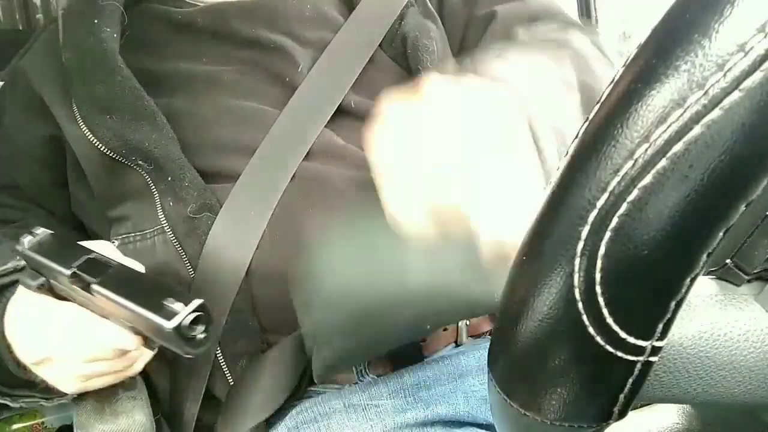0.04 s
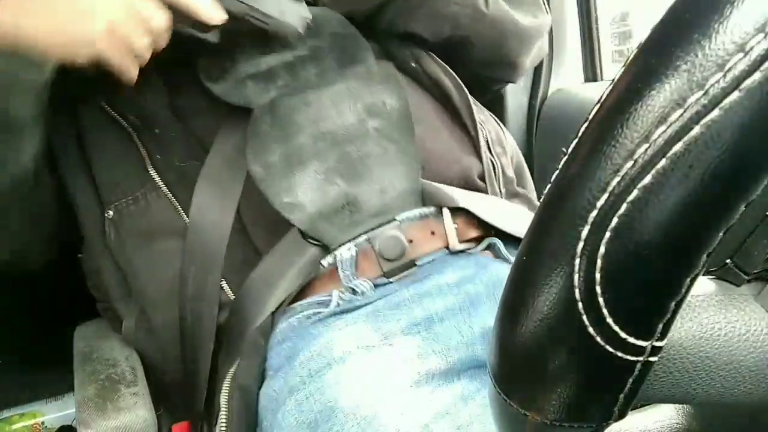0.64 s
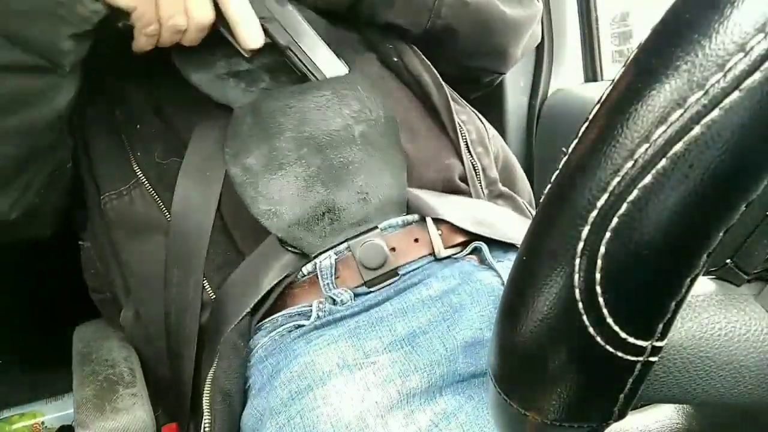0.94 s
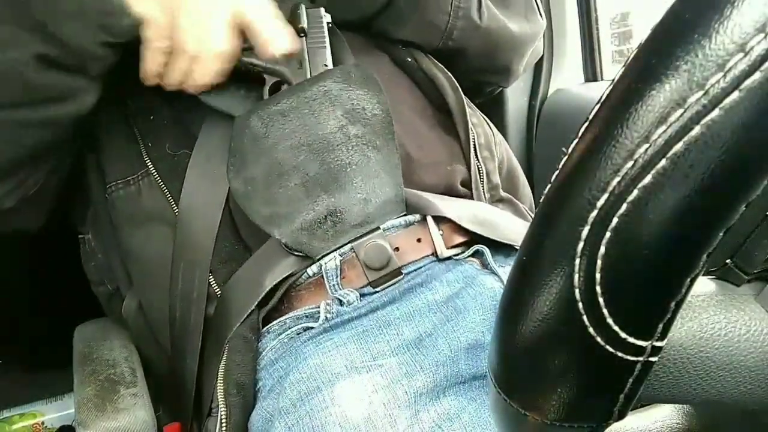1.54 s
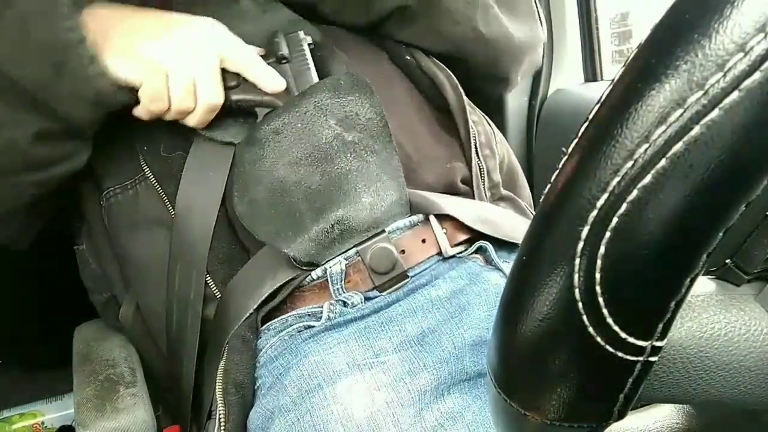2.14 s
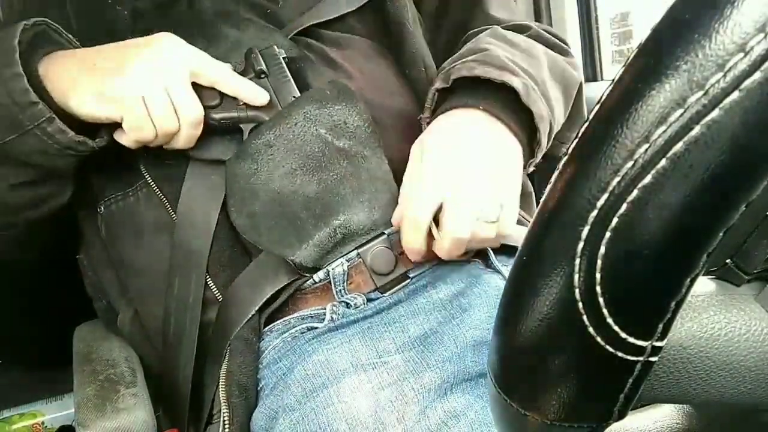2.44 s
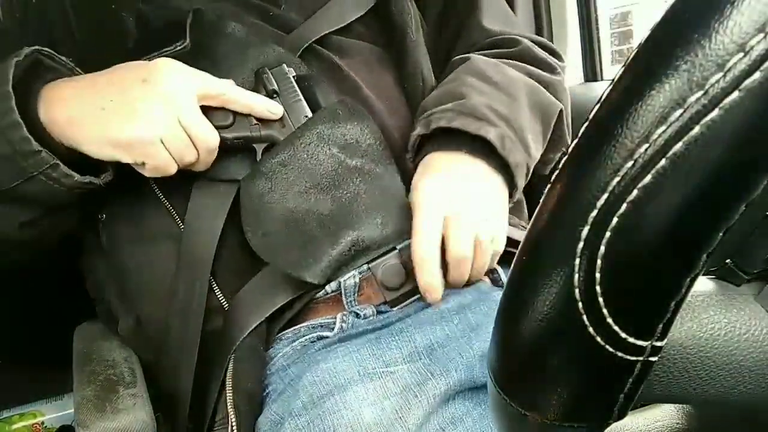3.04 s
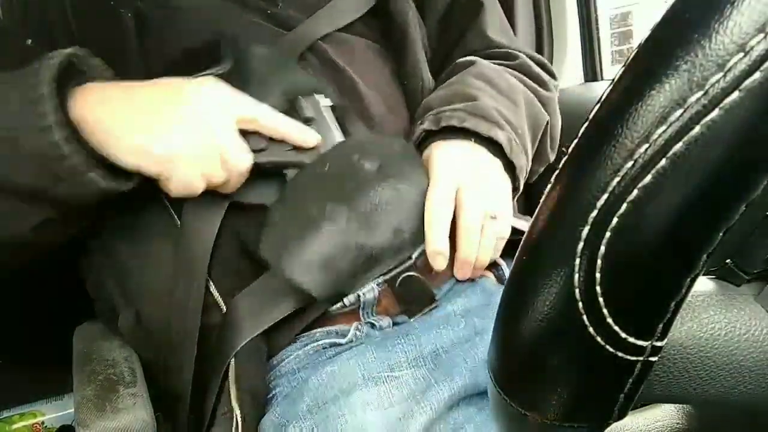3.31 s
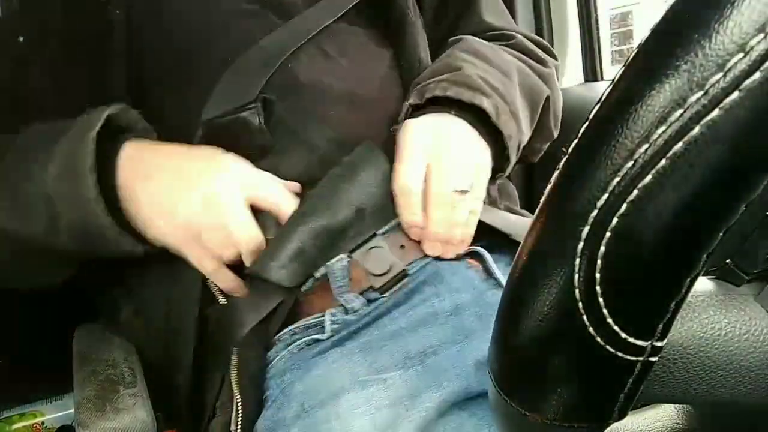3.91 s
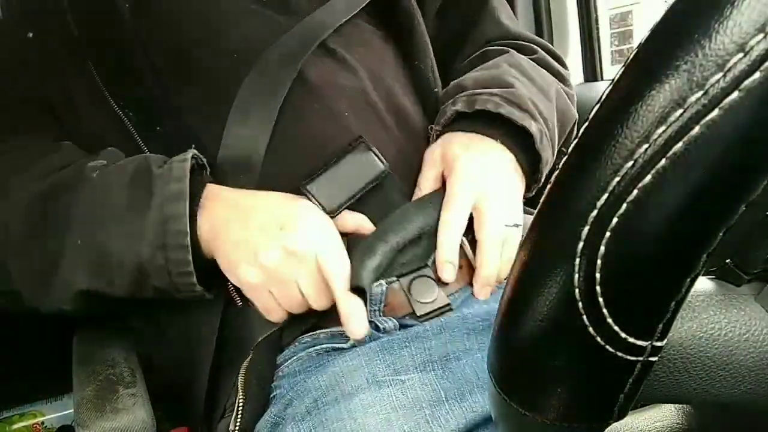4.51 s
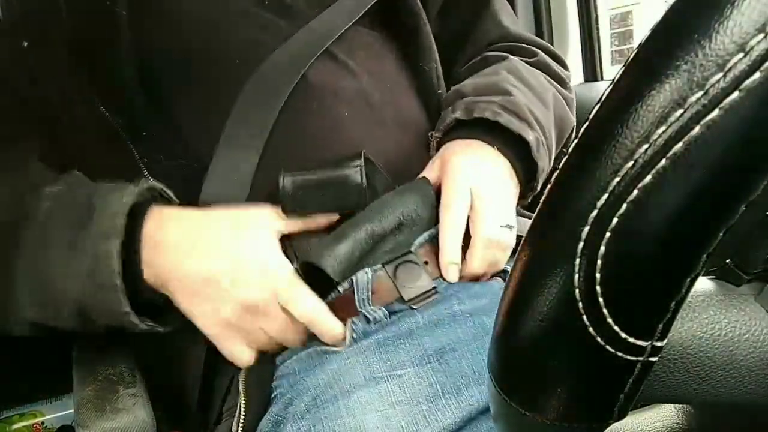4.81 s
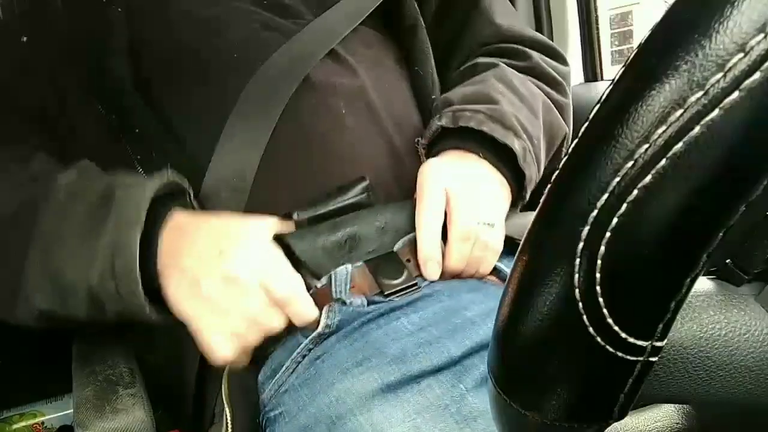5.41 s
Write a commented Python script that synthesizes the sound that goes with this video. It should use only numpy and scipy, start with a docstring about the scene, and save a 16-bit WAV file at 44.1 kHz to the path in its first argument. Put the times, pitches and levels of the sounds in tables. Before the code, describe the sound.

Jacket sleeves and a seat belt slide and crumple close to the microphone in a quiet, padded car cabin. From about 0.4 to 1.2 seconds a handgun taps and scrapes against a stiff leather holster, with dull low bumps as the leather presses on the body. Around 1.5 seconds a brief rasp and rustle end in a sharp knock. The movement goes almost still, and at 2.1 seconds the gun seats with one loud, dry snap with a slight metallic rattle, the loudest sound by far. A smaller click follows at 2.3 seconds. A sleeve swishes around 2.5 seconds, then the leather ticks faintly until 3 seconds. Rustling picks up from 3.5 seconds, with another firm knock at 3.6. Uneven fabric strokes, soft bumps and light taps of holster and buckle continue as it is tucked into the waistband, easing off by 5.6 seconds.

```python
"""Holstering a handgun in a car

A seated man in a parked car pushes a handgun into a stiff holster and tucks it into his waistband.
Jacket sleeves and the seat belt slide and crumple, and the leather rumbles, rasps and ticks.
The gun knocks against the holster and seats with one loud snap. The small padded cabin answers the
knocks and the snap within a few milliseconds; a phone close by listens through two microphones."""
import sys
import numpy as np
from scipy import signal
from scipy.fft import rfft, irfft, next_fast_len
from scipy.io import wavfile
from scipy.ndimage import uniform_filter1d, map_coordinates

SR = 44100
rng = np.random.default_rng(int(sys.argv[2]) if len(sys.argv) > 2 else 0)


def materialize(psi):
    """Save the field psi as 16-bit PCM at rate SR to the path in sys.argv[1].

    A 1-D psi becomes a single channel; in a 2-D psi each row is a channel.
    """
    bounded = np.clip(np.atleast_2d(psi).T, -1, 1)
    quanta = np.round(bounded * 32767).astype(np.int16)
    wavfile.write(sys.argv[1], SR, quanta)


N = 245195

# The tone colour of each noise. Columns: frequency_hz, gain_db
HISS_COLOUR = [(20, 4.5), (100, 1.5), (300, -41), (550, -15), (800, 16.5), (1100, -15), (3000, -25),
               (10000, 4), (15500, -5)]  # still cabin and microphone hiss
PADDING_COLOUR = [(20, -26), (45, -32.5), (90, -17), (135, -7), (170, -15.5), (230, 9.5), (280, 5),
                  (350, 4), (480, -7.5), (900, -37)]  # heavy layers of clothing
WEAVE_COLOUR = [(600, -31), (1200, 3.5), (1800, -2), (2100, 1), (2700, 3), (4300, 1), (7000, 0.5),
                (10000, 1), (13000, -2), (15500, -4.5)]  # sliding fabric
SLOW_SLIDE_COLOUR = [(500, 1.5), (7000, -1), (11000, 0.5), (15500, -5)]  # how that changes when it slides slowly
FOLD_COLOUR = [(200, -31), (330, -16.5), (450, 2.5), (560, -1), (680, -7.5), (800, 3), (890, -8),
               (955, 4.5), (1070, -9), (1200, -1), (1450, -11.5), (1750, -4.5), (2200, -11.5), (5000, -33)]  # buckling folds
BACKING_COLOUR = [(25, -24.5), (55, -13.5), (95, 1.5), (140, 0), (200, -14.5), (400, -42)]  # the holster's wide leather backing
RASP_COLOUR = [(450, -43), (800, 8.5), (1100, -2), (1400, 5.5), (1750, 5.5), (2300, -2), (3200, -27.5),
               (6000, -29)]  # the holster's mouth
TICK_COLOUR = [(200, -31.5), (360, -16.5), (480, -2), (760, 4.5), (1150, -9), (1700, 1), (2100, -2.5),
               (3200, -18.5), (8000, -28.5)]  # stiff leather giving way
CRACK_COLOUR = [(300, -24.5), (900, 6.5), (1900, 6), (2500, 0.5), (4150, 5.5), (4750, -7), (7500, -10.5),
                (9300, -7), (12000, -14), (15500, -18)]  # the sharp edge of the snap

# How alike left and right are (1 is the same): frequency_hz, likeness
STEREO_LIKENESS = [(60, 0.49), (300, 0.9), (650, 0.83), (1400, 0), (3000, 0.042), (7000, 0)]
# How much louder the left microphone is than the right: frequency_hz, gain_db
LEFT_LOUDER = [(60, 1), (300, 1.5), (800, 2.5), (2000, 1.5), (4400, 1.5), (8000, 0.5), (14000, -5.5)]
# How long the cabin rings (a fade is always the time to drop 60 dB): frequency_hz, fade_s
CABIN_FADES = [(100, 0.13), (500, 0.083), (2000, 0.022), (10000, .15)]
# Echoes off the wheel, dashboard and glass: delay_s, gain_db
NEAR_ECHOES = [(.0011, -17.5), (.0026, -8.5), (.0043, -10.5), (.0069, -11)]
# The body shifts under jacket and belt, and holds still around the snap: time_s, effort_db
BODY_EFFORT = [(0, -61), (1.1, -56), (1.27, -68), (1.65, -61), (1.85, -67), (1.94, -80), (2.07, -79),
               (2.135, -65), (2.23, -75.5), (2.4, -57.5), (2.75, -65), (2.92, -76), (3.29, -75.5),
               (3.7, -63), (4.1, -58), (4.45, -61.5), (5.1, -61.5), (5.56, -68.5)]
# The holster is pressed against the belly: peak_s, rise_s, padding_db, backing_db
BELLY_PRESSES = [ (0.17, 0.058, -58.5, -72), (0.36, 0.026, -56, -62.5), (0.44, 0.058, -55, -64),
                 (0.645, .1, -48, -60.5), (0.88, 0.057, -50, -56.5), (1.05, 0.13, -57, -69.5),
                 (1.555, 0.052, -53, -71), (2.15, 0.066, -72.5, -83.5), (2.42, 0.099, -67, -89),
                 (2.612, 0.029, -48.5, -83), (3.65, 0.043, -51, -71), (3.86, 0.07, -56, -76.5),
                 (4.345, 0.052, -54, -91), (4.735, 0.11, -58, -88), (5.0, 0.036, -47, -66)]
# A sleeve or hand sweeps over cloth: peak_s, rise_s, fall_s, hiss_db, folds_db, hollow_hz
SLEEVE_STROKES = [ (0.01, 0.086, .09, -51, -62.5, 806), (0.164, .07, 0.05, -48.5, -58.5, 477),
                  (0.446, 0.074, 0.036, -47.5, -55, 850), (0.67, .27, 0.28, -53, -55.5, 473),
                  (1.162, .028, 0.027, -56, -58, 800), (1.37, 0.064, 0.032, -57.5, -71, 1010),
                  (1.503, 0.043, 0.07, -45.5, -57.5, 627), (1.585, 0.049, .022, -44, -45.5, 648),
                  (2.55, 0.2, 0.12, -48, -54.5, 620), (2.613, .025, 0.028, -44.5, -49.5, 650),
                  (3.12, 0.044, 0.073, -51, -50, 830), (3.515, 0.068, 0.072, -47.5, -58, 704),
                  (3.635, 0.091, 0.069, -45.5, -52.5, 643), (3.815, 0.047, 0.093, -46.5, -49.5, 670),
                  (3.9, 0.11, 0.05, -44, -44, 701), (4.2, .075, 0.022, -50.5, -61.5, 890),
                  (4.35, 0.033, 0.028, -48, -46.5, 640), (4.55, 0.061, 0.093, -49.5, -54, 610),
                  (4.725, 0.12, .042, -47.5, -47.5, 550), (5.003, 0.035, 0.04, -48.5, -41, 1000),
                  (5.4, 0.3, 0.21, -65.5, -61, 494), (5.555, 0.022, .05, -58.5, -52.5, 680)]
# Hard knocks make the backing shudder: start_s, level_db
BACKING_JOLTS = [(0.612, -51), (2.087, -53), (2.332, -68), (3.644, -69)]
# The muzzle scrapes harder and harder until it catches: catch_s, rise_s, level_db
MUZZLE_RASPS = [(0.44, .03, -53.5), (0.9, .15, -64.5), (1.37, 0.11, -67), (1.58, 0.11, -47.5),
                (1.84, 0.024, -67.5)]
# The leather gives way under the grip: start_s, level_db
LEATHER_TICKS = [(2.023, -69), (2.734, -57), (2.766, -55.5), (2.839, -62.5), (2.944, -53), (3.002, -61.5)]
# Gun, holster and buckle touch, and at 4.993 s the folds crumple sharply: start_s, knock_db, pitch_hz, fade_s,
# tick_db
TOUCHES = [ (0.156, -43.5, 447, 0.085, -59), (0.611, -37, 300, 0.052, -70), (0.783, -38, 430, 0.012, -62),
           (0.822, -37.5, 372, 0.021, -72), (0.865, -43.5, 243, 0.084, -66), (0.865, -46, 2160, 0.033, -70),
           (0.9046, -37, 924, 0.028, -59), (1.053, -48.5, 1440, 0.036, -54), (1.143, -40, 814, 0.028, -69),
           (1.426, -62, 950, 0.02, -58), (1.509, -37.5, 668, 0.04, -65), (1.579, -26.5, 1190, 0.016, -49.5),
           (1.963, -65.5, 343, 0.2, -93), (2.257, -41.5, 840, 0.037, -49), (2.3297, -28, 557, 0.026, -55.5),
           (3.643, -27.5, 575, 0.047, -52.5), (4.344, -50, 250, 0.095, -65),
           (4.352, -38.5, 478, 0.035, -46), (4.617, -46, 1000, 0.047, -47), (4.698, -47.5, 378, 0.079, -60),
           (4.948, -51, 262, 0.08, -46), (4.993, -41, 816, 0.06, -59.5), (5.1836, -46.5, 537, 0.043, -81),
           (5.216, -54, 720, .03, -52.5), (5.408, -53, 534, 0.2, -51.5), (5.496, -49.5, 462, 0.066, -74)]
# The gun rides over the bump that holds it in, then hits bottom: start_s, thump_db, rattle_db
SNAP_CONTACTS = [(2.0781, -41, -40.5), (2.0822, -33.5, -38), (2.0864, -13.5, -18), (2.0903, -30.5, -19.5)]
# The notes of the holster's shell: pitch_hz, level_db, fade_s
SHELL_NOTES = [(587, 7, 0.019), (386, -23.5, 0.059), (720, -14.5, 0.034), (947, -15.5, 0.035)]
# The notes of the gun's slide and the stiff holster walls: pitch_hz, level_db, fade_s
RATTLE_NOTES = [(1272, -9, .05), (1400, -9, .05), (1630, -5, .06), (1897, 1, .065), (2127, -3, .06),
                (2845, -3, .045), (3640, -1, .05), (3790, -2, .045), (3948, -5, .06), (4155, -3, .05),
                (4460, -4, .05)]

SIDES = np.array([[1], [-1]])  # plus for left, minus for right


def amp(db):
    """Turn decibels into a gain."""
    return 10 ** (np.asarray(db) / 20)


def unit(x):
    """Scale a signal to an average power of 1."""
    return x / np.sqrt(np.mean(x ** 2) + 1e-20)


def along(points, hz):
    """Read a table between its rows, on a log frequency scale."""
    frequencies, values = np.transpose(points)
    return np.interp(np.log(hz + 1), np.log(frequencies + 1), values)


def wobble(per_s):
    """A smooth curve through per_s random values a second."""
    values = rng.standard_normal(int(N * per_s / SR) + 4)
    return map_coordinates(values, [np.arange(N) * per_s / SR])


def filtered(x, response):
    """Multiply each frequency in x by response(hz)."""
    length = x.shape[-1]
    padded = next_fast_len(length + 8192)
    return irfft(rfft(x, padded) * response(np.fft.rfftfreq(padded, 1 / SR)), padded)[..., :length]


def stereo(pair, colour):
    """Turn two unrelated noises into a coloured stereo pair of power 1, alike in the bass."""
    def response(hz):
        angle = np.arccos(np.clip(along(STEREO_LIKENESS, hz), -1, 1)) / 2
        return amp(along(colour, hz)) * [np.cos(angle), np.sin(angle)]
    mid, side = filtered(pair, response)
    return unit(np.array([mid + side, mid - side]))


def slips(per_s, scatter_db):
    """Rubbing surfaces stick and let go: two trains of tiny clicks, random in time and size."""
    happens = rng.random((2, N)) < per_s / SR
    direction = np.sign(rng.standard_normal((2, N)))
    return unit(happens * direction * amp(scatter_db * rng.standard_normal((2, N))))


def add(track, start_s, sound):
    """Mix a sound into the track."""
    start = round(start_s * SR)
    track[:, start:start + sound.shape[-1]] += sound[..., :N - start]


def swell(peak_s, rise_s, fall_s):
    """Gain of one movement: 10.5 dB down at rise_s before its peak and at fall_s after it."""
    t = np.arange(N) / SR - peak_s
    away = np.maximum(-t / rise_s, t / fall_s)
    gain, near = np.zeros(N), away < 6
    roundness = np.where(t[near] < 0, 1.47, 1.4)
    gain[near] = amp(-10.5 * np.abs(away[near]) ** roundness)
    return gain


def dying(events, fade_s):
    """A gain that jumps at each event and dies away."""
    t = np.arange(N) / SR
    return sum((t >= s) * amp(db - 60 * np.clip((t - s) / fade_s, 0, 2)) for s, db in events)


def together(levels_db, gains):
    """Level in dB of overlapping movements, whose powers add."""
    return 10 * np.log10(sum((amp(db) * gain) ** 2 for db, gain in zip(levels_db, gains)) + 1e-20)


def drifting(pair, depth_db):
    """The spots that touch keep changing, so the colour of the rubbing drifts."""
    spectra = signal.stft(pair, nperseg=512)[2]
    drift = uniform_filter1d(rng.standard_normal(spectra.shape), size=4, axis=1)
    drift = unit(uniform_filter1d(drift, size=9, axis=2))
    return unit(signal.istft(spectra * amp(depth_db * drift), nperseg=512)[1][:, :N])


def cabin_hiss():
    """The faint, steady noise of the cabin and the microphones."""
    return amp(-80) * stereo(rng.standard_normal((2, N)), HISS_COLOUR)


def cabin_echo(x, glass_s, glass_db, tail_db):
    """The direct sound, one bounce off the windscreen and a short tail among the seats."""
    hz, t, spectra = signal.stft(rng.standard_normal((2, SR // 4)), SR, nperseg=128)
    fade = amp(-60 * t / along(CABIN_FADES, hz)[:, None])
    tail = signal.istft(spectra * fade, SR, nperseg=128)[1]
    tail = stereo(tail, [(100, 0.017), (10000, 0.0)])
    answer = amp(tail_db) * tail / np.linalg.norm(tail[0])
    answer[:, 0] += amp(glass_db)
    echo = signal.fftconvolve(x, answer, axes=1)[:, :N]
    return x + filtered(echo, lambda hz: np.exp(-2j * np.pi * hz * glass_s))


def near_echoes(pair):
    """Close surfaces boost some pitches and cancel others, a little differently on each side."""
    paths = [(s * (1 + .12 * rng.standard_normal((2, 1))), db) for s, db in NEAR_ECHOES]
    response = lambda hz: 1 + sum(amp(db) * np.exp(-2j * np.pi * hz * s) for s, db in paths)
    return unit(filtered(pair, response))


def press_levels(effort):
    """Each press squeezes the padding and bends the backing, then lets go more slowly."""
    peak_s, rise_s, padding_db, backing_db = np.transpose(BELLY_PRESSES)
    forces = [swell(peak, rise, fall_s=1.49 * rise) for peak, rise in zip(peak_s, rise_s)]
    body_db = -19.5  # the shifting body stirs the padding too
    return together([body_db, *padding_db], [effort, *forces]), together(backing_db, forces)


def padding_bumps(level_db):
    """Heavy layers shift against the body and the seat in dull bumps."""
    return amp(level_db - 7.5) * stereo(slips(per_s=700, scatter_db=3.5), PADDING_COLOUR)


def stroke_curves(effort):
    """Hiss level, fold level and hollow pitch; the stroke that folds most cloth leads the pitch."""
    peak_s, rise_s, fall_s, hiss_db, stroke_folds_db, hollow_hz = np.transpose(SLEEVE_STROKES)
    brisk_db, resting_hz = -61.5, 800
    speeds = [swell(*row) for row in zip(peak_s, rise_s, fall_s)]
    body_folding = (effort / amp(brisk_db)) ** 0.6  # as the body slows, folds fade less than hiss
    folding = [body_folding, *speeds]
    folds_db = [brisk_db - 5.5, *stroke_folds_db]
    shares = [(amp(db) * gain) ** 2 for db, gain in zip(folds_db, folding)]
    pitch_hz = sum(hz * share for hz, share in zip([resting_hz, *hollow_hz], shares)) / sum(shares)
    return together([0, *hiss_db], [effort, *speeds]), together(folds_db, folding), pitch_hz


def sliding_cloth(level_db):
    """Threads catch on threads: a fine hiss that flutters, sways and brightens with speed."""
    threads = stereo(slips(per_s=12000, scatter_db=1.0), WEAVE_COLOUR)
    fast = drifting(near_echoes(threads), depth_db=2.0)
    slow = filtered(fast, lambda hz: amp(along(SLOW_SLIDE_COLOUR, hz)))
    speed = np.interp(level_db, [-64, -50], [0, 1])
    sway_db = 1.1 * wobble(per_s=5) * SIDES
    flutter_db = 0.77 * wobble(per_s=70)
    return amp(level_db + flutter_db + sway_db) * (speed * fast + (1 - speed) * slow)


def hand_hollow(pair, centre_hz, boost_db, width_octaves):
    """The hollow under the hand boosts a gliding pitch and keeps the loudness the same."""
    hz, t, spectra = signal.stft(pair, SR, nperseg=512)
    octaves_away = np.log2((hz[:, None] + 1) / np.interp(t, np.arange(N) / SR, centre_hz))
    gain = amp(boost_db * np.exp(-(octaves_away / width_octaves) ** 2))
    gain /= np.linalg.norm(gain * amp(along(FOLD_COLOUR, hz))[:, None], axis=0)
    return unit(signal.istft(spectra * gain, SR, nperseg=512)[1][:, :N])


def crumpling_folds(level_db, hollow_hz):
    """Folds of jacket and leather buckle in small hollow crackles."""
    crackles = stereo(slips(per_s=1700, scatter_db=2.5), FOLD_COLOUR)
    crackles = hand_hollow(crackles, hollow_hz, boost_db=7.5, width_octaves=0.58)
    return amp(level_db - 3.12 + 3.0 * wobble(per_s=37)) * crackles


def backing_rumble(bend_db):
    """The leather backing rumbles as it is bent or jolted."""
    gain = amp(bend_db) + dying(BACKING_JOLTS, fade_s=0.19)
    return gain * stereo(slips(per_s=400, scatter_db=5.5), BACKING_COLOUR)


def muzzle_rasp():
    """The muzzle scratches along the holster's mouth and stops short when it catches."""
    scratches = stereo(slips(per_s=2000, scatter_db=3.5), RASP_COLOUR)
    push = sum(amp(db) * swell(catch_s, rise_s, fall_s=.018) for catch_s, rise_s, db in MUZZLE_RASPS)
    return push * drifting(scratches, depth_db=3)


def leather_ticks():
    """Stiff leather gives way in small dry ticks."""
    giving = dying(LEATHER_TICKS, fade_s=0.081)
    ticks = stereo(giving * slips(per_s=10000, scatter_db=1.0), TICK_COLOUR)
    return np.sqrt(np.mean(giving ** 2)) * ticks


def knocks():
    """Each touch is a short note, a rough burst around that note and a bright tick of scraped fabric."""
    out, t = np.zeros((2, N)), np.arange(SR // 6) / SR
    for start_s, knock_db, hz, fade_s, tick_db in TOUCHES:
        note = np.sin(2 * np.pi * hz * t)
        around_note = [(hz / 6, -24), (hz * .4, -13), (hz * .77, -2),
                       (hz * 1.21, 0), (hz * 3.1, -21), (hz * 6, -42)]
        burst = stereo(rng.standard_normal((2, len(t))), around_note)
        tick = stereo(rng.standard_normal((2, len(t))), WEAVE_COLOUR)
        onset = 1 - np.exp(-3 * t * hz)  # a padded touch builds up over a third of a cycle
        knock = amp(knock_db - 60 * t / fade_s) * onset * (.65 * note + .5 * burst)
        add(out, start_s, knock + amp(tick_db - 60 * t / 0.074) * tick)
    return cabin_echo(out, glass_s=.0048, glass_db=-8, tail_db=-5)


def holster_snap():
    """The gun seats: four quick contacts thump the holster's shell and rattle the slide."""
    out, t = np.zeros((2, N)), np.arange(SR // 4) / SR
    shell = sum(amp(db - 60 * t / fade_s) * np.sin(2 * np.pi * hz * t) for hz, db, fade_s in SHELL_NOTES)
    shell *= 1 - np.exp(-t / .0012)
    for start_s, thump_db, rattle_db in SNAP_CONTACTS:
        # short waves reach each microphone at a different point in their cycle
        ring = sum(amp(db - 60 * t / fade_s) * np.sin(2 * np.pi * hz * t + rng.normal(0, 1.0, (2, 1)))
                   for hz, db, fade_s in RATTLE_NOTES)
        crack = stereo(rng.standard_normal((2, len(t))), CRACK_COLOUR) * amp(-60 * t / 0.058)
        add(out, start_s, amp(thump_db) * shell + amp(rattle_db) * (.12 * ring + .32 * crack))
    out = signal.lfilter(*signal.butter(2, 130, "high", fs=SR), out)  # a small shell gives off no bass
    lean_left_db, right_lead_s = .4, .00009
    out = amp(lean_left_db * SIDES) * out
    out = filtered(out, lambda hz: np.exp(-1j * np.pi * hz * right_lead_s * SIDES))
    return cabin_echo(out, glass_s=.0055, glass_db=-26, tail_db=-14)


def scene():
    """Cloth, leather, knocks and the snap over the quiet of the cabin."""
    effort = amp(np.interp(np.arange(N) / SR, *np.transpose(BODY_EFFORT)))
    slide_db, fold_db, hollow_hz = stroke_curves(effort)
    padding_db, backing_db = press_levels(effort)
    hiss = cabin_hiss()
    cloth = sliding_cloth(slide_db) + crumpling_folds(fold_db, hollow_hz) + padding_bumps(padding_db)
    leather = backing_rumble(backing_db) + muzzle_rasp() + leather_ticks()
    return hiss + cloth + leather + knocks() + holster_snap()


def record(dry):
    """The two microphones differ in colour and lose the very highest treble."""
    top_hz = 15550
    microphones = filtered(dry, lambda hz: amp(along(LEFT_LOUDER, hz) / 2 * SIDES))
    return filtered(microphones, lambda hz: hz < top_hz)


dry = scene()
out = record(dry)
materialize(out)
```